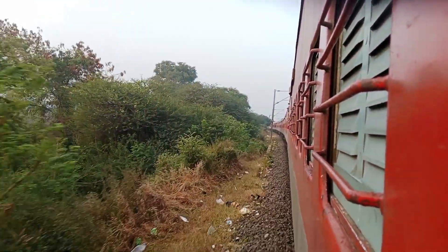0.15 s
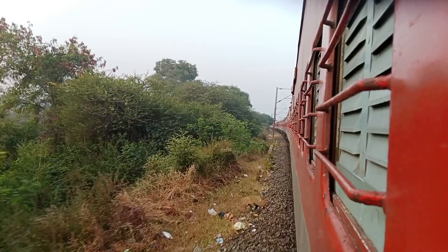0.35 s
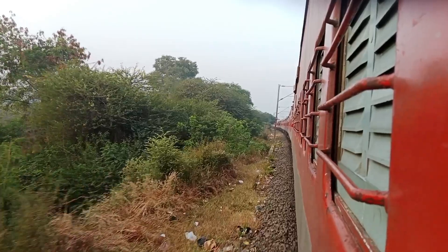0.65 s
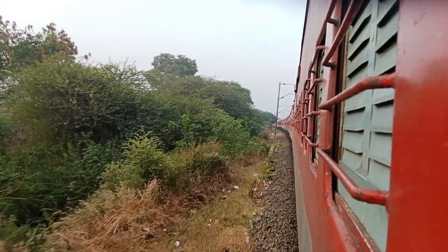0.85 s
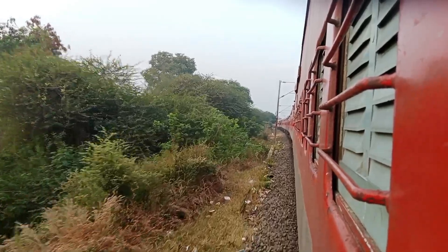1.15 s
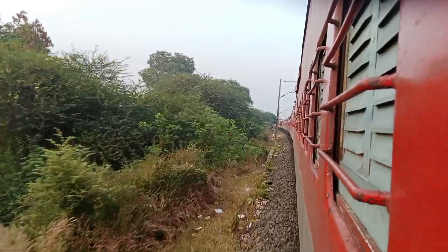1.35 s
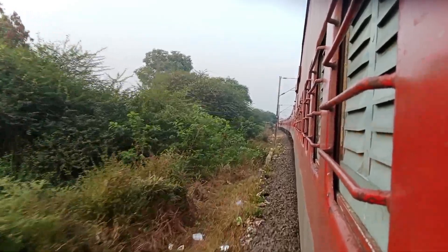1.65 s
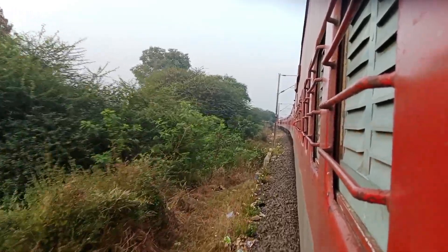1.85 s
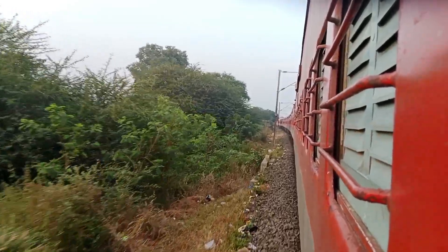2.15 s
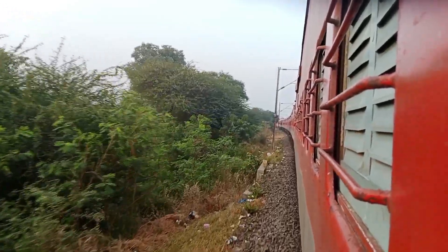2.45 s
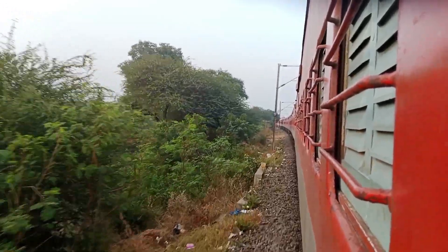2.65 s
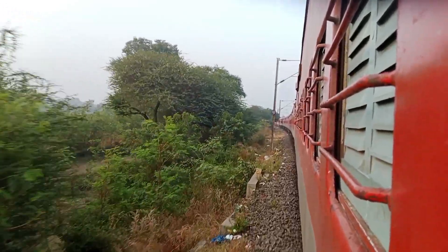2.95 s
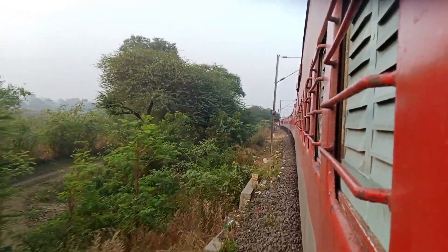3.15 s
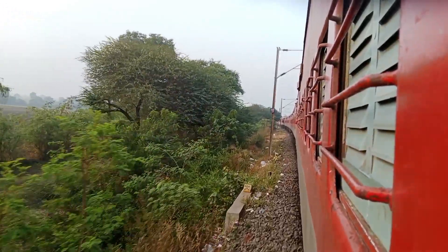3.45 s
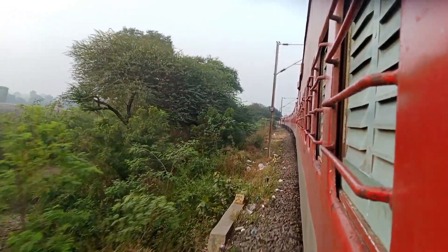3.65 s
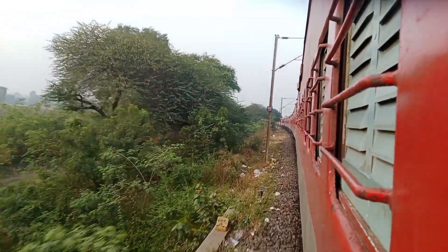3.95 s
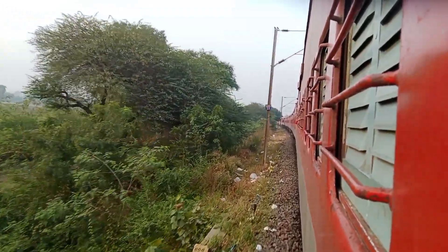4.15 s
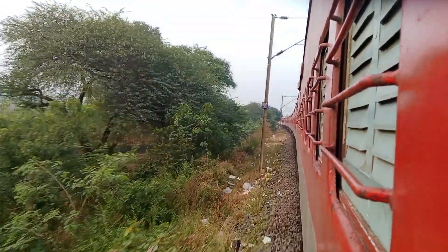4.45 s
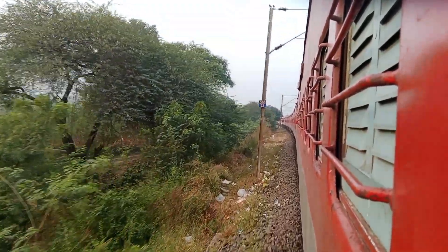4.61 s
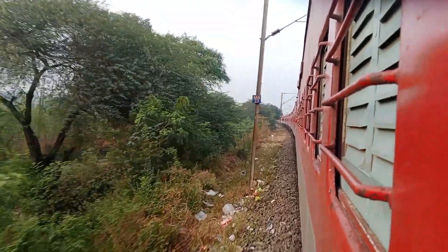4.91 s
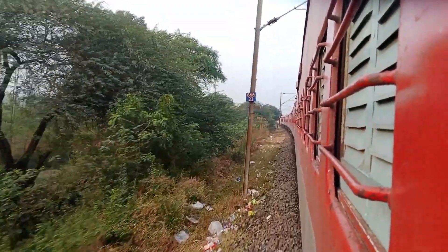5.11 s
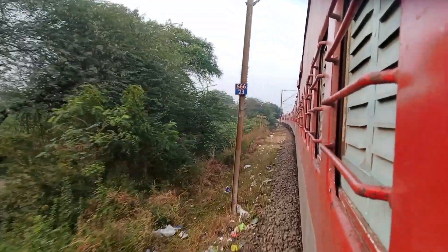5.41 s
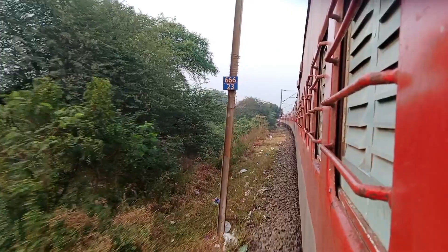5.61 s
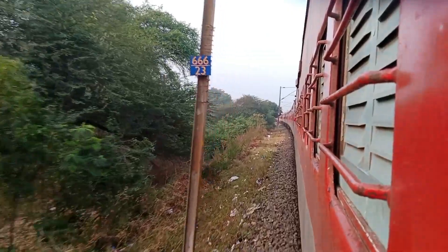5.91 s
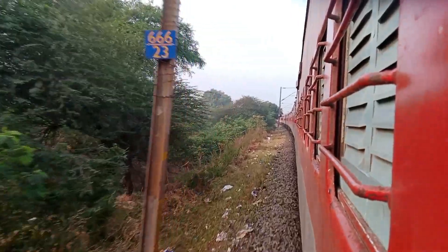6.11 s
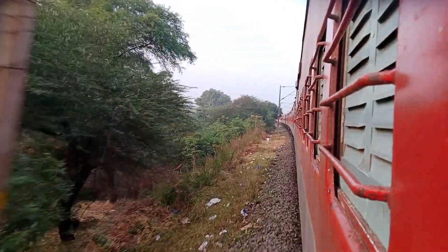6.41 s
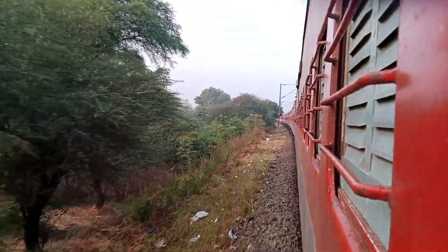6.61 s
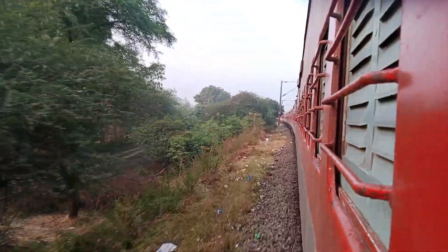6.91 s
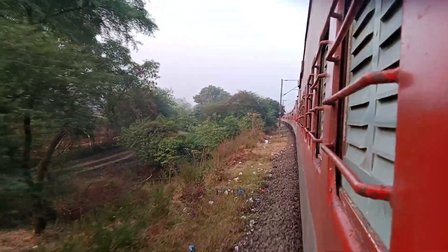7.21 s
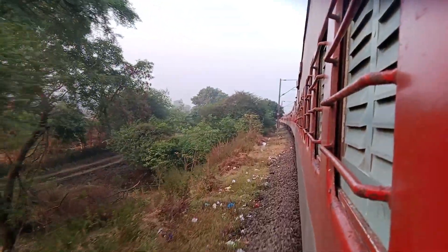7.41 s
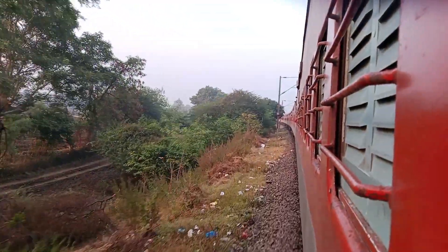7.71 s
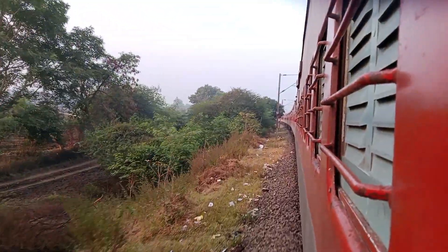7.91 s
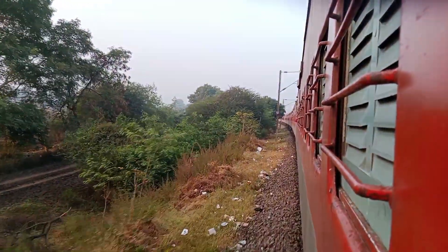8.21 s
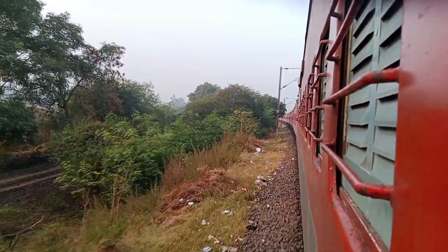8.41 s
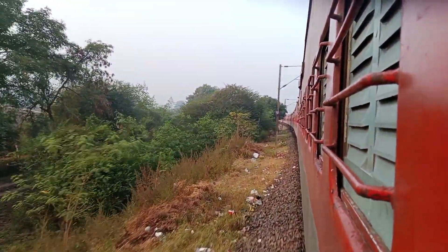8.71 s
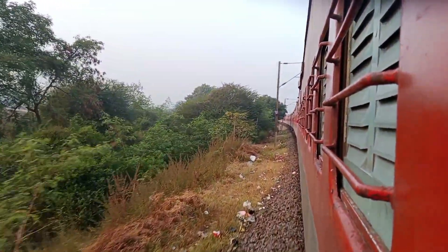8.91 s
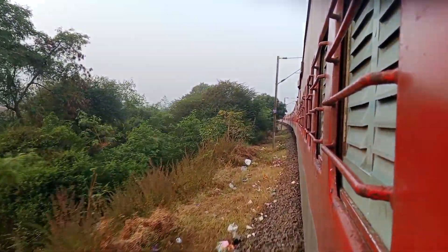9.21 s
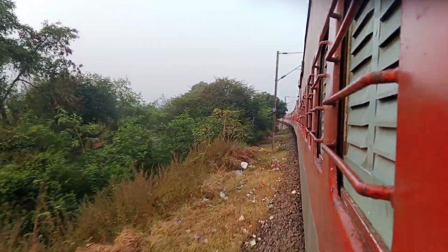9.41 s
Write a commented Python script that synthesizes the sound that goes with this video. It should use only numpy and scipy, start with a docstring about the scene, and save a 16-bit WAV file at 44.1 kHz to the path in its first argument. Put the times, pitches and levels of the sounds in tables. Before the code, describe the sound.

Loose steel window shutters on a rolling train rattle and clack about three times a second over a low wheel rumble and soft wind thuds.

```python
"""Loose steel shutter slats shake about three times a second at an open window of a rolling passenger coach.
They jingle as many small taps on steel tones, clack in short bursts, and single tones ring out of the rattle.
Under them the wheels make a rumble, a roar and two low drones, all shaped from noise.
Wind thuds on the microphone as swells of low noise; now and then a short, wavering hollow note swells."""
import sys
import numpy as np
from scipy import signal
from scipy.fft import rfft, irfft, next_fast_len
from scipy.io import wavfile
from scipy.ndimage import uniform_filter1d, map_coordinates

SR = 44100
rng = np.random.default_rng(int(sys.argv[2]) if len(sys.argv) > 2 else 0)


def to_wav(sig):
    """Store sig (one row per channel, or 1-D mono) as 16-bit WAV at the path in sys.argv[1].

    Samples outside -1..1 are clipped; the rate is SR.
    """
    pcm = np.clip(np.atleast_2d(sig), -1, 1) * 32767
    pcm = np.round(pcm).astype(np.int16)
    wavfile.write(sys.argv[1], SR, pcm.T)  # frames by channels


N = 421596
M = next_fast_len(N + SR)  # length with spare room, so filtering does not wrap round into the scene
HZ = np.fft.rfftfreq(M, 1 / SR)
TIME = np.arange(N) / SR


def amp(db):
    """Turn decibels into a plain amplitude factor."""
    return 10 ** (np.asarray(db) / 20)


def unit(x):
    """Scale a signal to rms 1."""
    return x / np.sqrt(np.mean(x ** 2) + 1e-20)


def along(points, hz):
    """Read a curve of (f/Hz, value) points on a log frequency axis."""
    f, value = np.transpose(points)
    return np.interp(np.log(hz + 1), np.log(f + 1), value)


def curves(rows):
    """Give one value per sample for each column after the time."""
    s, *columns = np.transpose(rows)
    return [np.interp(TIME, s, column) for column in columns]


def wobble(per_s):
    """A smooth random curve through per_s random points a second."""
    points = rng.standard_normal(int(N * per_s / SR) + 4)
    return map_coordinates(points, [TIME * per_s])


def noise(gain):
    """Noise of rms 1 with a gain for each frequency."""
    spectrum = rfft(rng.standard_normal(M)) * gain
    return unit(irfft(spectrum, M)[:N])


def resonance(hz, width_hz, at=HZ):
    """A narrow tone of a vibrating body with a soft start: one pole taken twice."""
    return 1 / (1 + 2j * (at - hz) / width_hz) ** 2


def patchy(x, depth_db):
    """Random gain in patches of about 200 Hz and 50 ms."""
    z = signal.stft(x, nperseg=1024)[2]
    field = uniform_filter1d(rng.standard_normal(z.shape), size=5, axis=0)
    field = uniform_filter1d(field, size=4, axis=1)
    return unit(signal.istft(z * amp(depth_db * unit(field)), nperseg=1024)[1][:N])


def blocky_patches(x, depth_db):
    """Random gain in sharp-edged patches about 200 Hz wide and 60 ms long."""
    z = signal.stft(x, nperseg=512)[2]
    field = uniform_filter1d(rng.standard_normal(z.shape), size=2, axis=0)
    field = uniform_filter1d(field, size=10, axis=1)
    gain = amp(depth_db * np.tanh(1.5 * unit(field) - .6))
    gain = gain / np.sqrt(np.mean(gain ** 2))
    return signal.istft(z * gain, nperseg=512)[1][:N]


def add_tone(out, s, length, hz, width_hz, db, rough, edge):
    """Add a held tone whose size and phase waver width_hz times a second, with soft edges in seconds."""
    t = np.arange(round((length + edge) * SR)) / SR
    knots = rng.standard_normal((2, 40))
    real, imag = (map_coordinates(k, [t * width_hz], mode="grid-wrap") for k in knots)
    waver = 1 + rough * (real + 1j * imag)
    tone = np.real(waver * np.exp(2j * np.pi * hz * t))
    level = np.sin(np.pi / 2 * np.clip(np.minimum(t, t[-1] - t) / edge, 0, 1)) ** 2
    part = out[max(round((s - edge / 2) * SR), 0):][:len(t)]
    part += (amp(db) * level * unit(tone))[:len(part)]


# Colour of the rattling steel: f/Hz, level per Hz/dB
STEEL_COLOUR = [(530, -33), (900, -14.5), (1080, -20), (1230, 2), (1350, 2), (1880, 4.5), (2310, 2.5),
                (4500, 2), (5250, -6), (6510, -7), (7250, -23.5), (10500, -21), (11400, -21), (12300, -56),
                (15600, -37)]


def jingle(modes, taps_per_s, spread_db, waver_db):
    """Spectrum of tones each tapped at its own random moments; each tone's level wavers slowly at random."""
    out = np.zeros(len(HZ), complex)
    half = round(500 * M / SR)  # each tone is worked out 500 Hz to either side
    slots = 2 * half
    slots_per_s = slots * SR / M
    for hz, width_hz, db in modes:
        when, size, turn = rng.random((3, slots))
        waver_points = np.arange(slots) / slots_per_s * 9.5  # 9.5 random points a second
        waver = np.interp(waver_points, np.arange(200), rng.standard_normal(200))
        size_db = waver_db * waver - spread_db * np.log(size + 0.0013)
        tapped = when < taps_per_s / slots_per_s
        taps = tapped * amp(size_db) * np.exp(2j * np.pi * turn)
        centre = round(hz * M / SR)
        near = slice(centre - half, centre + half)
        ring = resonance(hz, width_hz, HZ[near]) / np.sqrt(width_hz)
        out[near] += amp(db + along(STEEL_COLOUR, hz)) * np.fft.fftshift(np.fft.fft(taps)) * ring
    return out


# The four kinds of part, in order: big slats, middle slats, small fittings, finest parts.
# Their level against the idle level: level/dB
PART_REST_DB = [-12, -7, -11, -33]
# How widely each kind follows the shape of a jolt: dB per dB
PART_SWING = [1.036, 1.036, 1.08, 1.21]
# Idle ticking between jolts: t/s, level/dB
IDLE_TICKING = [(0.0, -43.5), (0.74, -41), (0.98, -42.5), (1.89, -38), (3.33, -49), (3.72, -43),
                (5.19, -42), (5.35, -45), (6.42, -43), (6.58, -53), (7.4, -47), (7.53, -44), (8.33, -55),
                (9.56, -46)]
# Jolts of the coach body: t/s, length/s, level/dB, then level/dB against it of the big slats, small fittings
# and finest parts; start below peak/dB, peak at share of length, end below peak/dB, lead-in below peak/dB,
# fall over the tail/dB
JOLTS = [(0.18, 0.14, -29, 0, 0.5, -28.5, 1.5, 0.22, 8.5, 10, 11),
         (0.522, 0.16, -29, -2.5, -7, -31, -1, 0.2, 9, 14, 14),
         (0.877, 0.058, -26.5, 1, -3.5, -24.5, 8, 0.2, 8.5, 8.5, 9),
         (1.152, 0.13, -29.5, -2, -3.5, -23, 1.5, 0.7, 0.5, 18, 9),
         (1.353, 0.035, -34.5, -23, -21, -29, 3, 0.35, 11, 10, 10),
         (1.57, 0.16, -30.5, -5.5, -6.5, -26, 6, 0.26, 6.5, 10, 5),
         (1.869, 0.11, -21.5, -4.5, -8.5, -24, 5, 0.62, 9, 26, 10),
         (2.231, 0.17, -26, -1.5, -4, -17.5, 0, 0.27, 11, 12.5, 11),
         (2.569, 0.14, -25, -0.5, -0.5, -18, 2.5, 0.47, 12, 12.5, 11),
         (2.896, 0.08, -25, -1, -4, -19.5, 0, 0.35, 10.5, 10.5, 3),
         (3.227, 0.11, -28, -5, -5.5, -18, -1, 0.35, 6.5, 14.5, 4),
         (3.563, 0.12, -27.5, -1.5, -1, -21.5, 5.5, 0.29, 5.5, 8, 3.5),
         (3.856, 0.19, -28.5, -1, -6, -20, -0.5, 0.2, 10, 9, 12),
         (4.162, 0.12, -28, 0.5, -2, -18.5, 2.5, 0.77, 10.5, 11, 0.5),
         (4.501, 0.099, -28, -4.5, -3.5, -18.5, 4, 0.85, 7.5, 15, 3.5),
         (4.846, 0.077, -27.5, -0.5, -1.5, -23, 14, 0.33, 7, 16, 6),
         (5.151, 0.1, -29.5, -0.5, -3, -18, 5, 0.78, 7, 33, 0.5),
         (5.442, 0.11, -27, -1.5, -5, -19, 3.5, 0.62, 3.5, 9, 3),
         (5.819, 0.088, -30, -11, -5.5, -22, -1, 0.38, 9.5, 6, 0),
         (6.124, 0.045, -30, -7, -5, -32, -1, 0.5, 7.5, 9, 36),
         (6.44, 0.12, -25, -8, -1.5, -23.5, -1.5, 0.37, 9, 14.5, 21),
         (6.733, 0.13, -21, -5.5, -4, -29, 2.5, 0.47, 8, 16, 26),
         (7.062, 0.095, -31, -4.5, -3, -22, 1, 0.22, 6, 11.5, 8.5),
         (7.363, 0.15, -25.5, -3, -4, -24.5, 1.5, 0.31, 6.5, 15, 9),
         (7.668, 0.13, -26.5, -3, -1.5, -26, 0, 0.22, 12, 9, 7),
         (7.965, 0.076, -31, -1, -3.5, -23, 4, 0.35, 8.5, 7, 14),
         (8.227, 0.13, -27, -8.5, -2, -25.5, 7, 0.51, 6, 22, 28),
         (8.573, 0.056, -30.5, -11, -8.5, -22, 6.5, 0.68, 8, 7.5, 14),
         (8.866, 0.13, -25.5, -5.5, -3.5, -25.5, 0, 0.35, 9.5, 13.5, 20),
         (9.165, 0.055, -27, 1.5, 3, -17.5, 2.5, 0.79, 8.5, 12, 11),
         (9.47, 0.11, -23, -4.5, -3.5, -24.5, 1, 0.35, 14, 13, 14)]
LEAD_S, ATTACK_S, DROP_DB, DROP_S = .056, 0.016, 6, 0.019  # lead-in, attack, and step down at the end
RINGING_DB = 2  # taken off each jolt's rattle to leave room for clacks and single rings
TAIL_S, TAIL_STEEPER = 0.083, [1.48, 1.55, 2.2, 1.2]  # how much steeper each kind of part falls in the tail
HUSH_S, HUSH_DB = 0.087, 6  # the idle ticking settles just before each lead-in


def shaking():
    """Level of each kind of part: a jolt has a lead-in, quick attack, swell, sag, step down and tail."""
    hush_times = [-HUSH_S - ATTACK_S, -ATTACK_S, 0]
    hush_db = sum(np.interp(TIME - s + LEAD_S, hush_times, [0, -HUSH_DB, 0]) for s, *_ in JOLTS)
    idle_db = curves(IDLE_TICKING)[0] + hush_db + 3 * wobble(per_s=14)
    power = amp(np.add.outer(PART_REST_DB, idle_db)) ** 2
    for s, length, db, low_db, high_db, top_db, start_db, share, end_db, lead_db, tail_db in JOLTS:
        t = TIME - s
        rise = share * length
        at = np.cumsum([-LEAD_S - ATTACK_S, ATTACK_S, LEAD_S, ATTACK_S, rise, length - rise, DROP_S])
        body_db = np.interp(t, at, [-60, -lead_db, -lead_db, -start_db, 0, -end_db, -end_db - DROP_DB])
        fall_db = np.outer(TAIL_STEEPER, tail_db * np.maximum(t - at[-1], 0) / TAIL_S)
        part_db = np.add([[low_db], [0], [high_db], [top_db]], db - RINGING_DB)
        power += amp(part_db + np.outer(PART_SWING, body_db) - fall_db) ** 2
    return np.sqrt(power)


# Edges of the pitch ranges of the four kinds of part: f/Hz
PART_EDGES_HZ = [1050, 2300, 4000, 7200, 15600]
# Strongest tones of the slats: f/Hz, width/Hz, level above the crowd of small tones/dB
SLAT_TONES = [(1243, 57, 5.5), (1481, 37, -4.5), (1668, 150, -3), (1864, 97, -6), (2150, 67, 3),
              (2510, 120, 3), (2824, 180, 1.5), (2960, 160, -1.5), (3380, 190, -2), (3556, 150, 9),
              (3916, 88, 7), (4465, 140, 4), (5105, 72, 0.5), (5605, 110, 11), (6630, 60, 3),
              (7650, 100, 17.5), (9890, 160, 15), (11217, 190, 21), (11900, 170, 3), (13200, 400, 4),
              (14700, 400, 14)]


def rattle():
    """Strong slat tones and a crowd of small ones jingle as hard as each kind of part is shaken."""
    crowd_hz = np.linspace(1130, 11700, num=200) + rng.normal(0, 18, size=200)
    crowd = [(hz, 20 + 0.008 * hz, 0) for hz in crowd_hz]
    spectrum = jingle(SLAT_TONES + crowd, taps_per_s=80, spread_db=2, waver_db=3)
    out = np.zeros(N)
    for lo, hi, level in zip(PART_EDGES_HZ, PART_EDGES_HZ[1:], shaking()):
        part = irfft(spectrum * (HZ >= lo) * (HZ < hi), M)[:N]
        # even out the strength over 0.12 s, so that the shaking alone sets the level
        strength = np.sqrt(np.abs(uniform_filter1d(part ** 2, round(0.12 * SR))) + 1e-20)
        out += level * part / strength
    return out


# Wheels on rails: t/s, rumble level/dB, roar level at 330-950 Hz/dB
ROLLING = [(0.0, -47.5, -51), (0.32, -41.5, -52.5), (0.67, -47.5, -55), (1.2, -44.5, -54),
           (1.81, -43.5, -54.5), (2.58, -46, -52), (2.98, -46, -55), (3.67, -46, -52), (4.05, -44, -54),
           (4.13, -43, -51), (4.76, -47, -55), (5.93, -42.5, -53.5), (6.5, -46.5, -55), (7.16, -44.5, -53),
           (8.55, -46, -55.5), (8.92, -44.5, -53.5), (9.37, -49, -52), (9.56, -45, -57)]
# Colour of the rumble: f/Hz, level per Hz/dB
RUMBLE_COLOUR = [(15, -53), (25, -43), (78, -2), (108, 3), (184, -2), (237, -4), (286, -4.5), (400, -9.5),
                 (520, -21.5), (880, -120)]
# Colour of the roar: f/Hz, level per Hz/dB
ROAR_COLOUR = [(250, -56), (330, -2), (600, 1.5), (950, -6.5), (1300, -7.5), (3500, -11), (6000, -21),
               (8000, -32), (11500, -40), (12500, -41), (15500, -39)]
# Unsteady drones: f/Hz, width/Hz, rms level/dB
DRONES = [(111.5, 26, -51), (233.5, 15.3, -53)]
ROAR_DB = 0.9  # the roar over all its band against its level at 330-950 Hz


def wheels():
    """Rolling noise: a wavering rumble, a broad roar, and two drones of noise in narrow bands."""
    rumble_db, roar_db = (curve + 1.5 * wobble(per_s=6) for curve in curves(ROLLING))
    rumble = amp(rumble_db) * patchy(noise(amp(along(RUMBLE_COLOUR, HZ))), depth_db=2.5)
    roar = amp(roar_db + ROAR_DB) * patchy(noise(amp(along(ROAR_COLOUR, HZ))), depth_db=1.8)
    drones = sum(amp(db) * noise(resonance(hz, width_hz)) for hz, width_hz, db in DRONES)
    return rumble + roar + drones


def swell(s, length, edge):
    """A level that rises around s and falls again around s + length; short ones stay below full level."""
    t = TIME - s
    return np.clip(np.minimum(t, length - t) / edge + .5, 0, 1) ** 2


# Wind thuds: t/s, relative level/dB, length/s
WIND_THUDS = [(0.134, -27, .04), (.42, -41, .05), (.72, -51, 0.039), (1.75, -18, 0.063), (2.6, -27, 0.059),
              (4.082, -15, 0.067), (4.364, -50, 0.057), (5.13, -20, 0.028), (5.985, -25, 0.062),
              (6.333, -21.5, 0.022), (8.855, -26, 0.088)]


def wind():
    """Air thuds on the microphone: low noise around 94 Hz let through in short swells."""
    low = noise(resonance(94, 89))
    return low * sum(amp(db - 13.0) * swell(s, length, edge=0.083) for s, db, length in WIND_THUDS)


# Single clacks: t/s, relative level/dB, favoured pitch f/Hz, time to fall by 60 dB/s
CLACKS = [(0.1323, -22, 4390, 0.12), (0.2053, -8, 2670, 0.071), (0.4875, -14.5, 2390, 0.22),
          (0.5437, -3, 4410, 0.07), (0.8077, -20, 1280, 0.23), (0.8834, -13, 1903, 0.14),
          (1.1653, -16, 3360, 0.083), (1.2266, -17, 3424, 0.23), (1.3647, -15.5, 3120, 0.093),
          (1.5054, -10.5, 1240, 0.028), (1.565, -7, 3550, 0.041), (1.6067, -9.5, 1406, 0.039),
          (1.6661, -16.5, 1246, 0.1), (1.849, -18, 2990, 0.15), (1.9074, -5.5, 3343, 0.075),
          (2.047, -15.5, 1242, 0.093), (2.246, -6, 4510, 0.051), (2.5193, -18.5, 4010, 0.32),
          (2.5727, -26, 2190, 0.096), (2.6554, -10, 4537, 0.18), (2.772, -25.5, 4970, 0.1),
          (2.86, -16, 1815, 0.13), (2.911, -8, 4430, 0.11), (3.189, -10, 3970, 0.06),
          (3.242, -9, 1790, 0.053), (3.515, -22, 3940, 0.17), (3.571, -10, 3450, 0.084),
          (3.8434, -12.5, 4460, 0.067), (3.9104, -3, 1940, 0.052), (4.1683, -10.5, 2920, 0.13),
          (4.3702, -15, 1640, 0.036), (4.4987, -12, 4760, 0.092), (4.556, -11.5, 3940, 0.12),
          (4.818, -15, 2640, 0.088), (4.8453, -35, 4330, 0.12), (5.1359, -17, 3260, 0.17),
          (5.1927, -8.5, 3346, 0.093), (5.361, -16.5, 2750, 0.1), (5.418, -21.5, 4080, 0.18),
          (5.457, -23, 3420, 0.068), (5.509, -7, 3940, 0.09), (5.6569, -16.5, 1480, 0.26),
          (5.7718, -16.5, 3900, 0.14), (5.825, -13.5, 2860, 0.14), (6.0827, -13.5, 4770, 0.13),
          (6.1383, -10.5, 3670, 0.13), (6.4492, -18, 3380, 0.12), (6.7073, -18, 4344, 0.17),
          (6.76, -2, 3300, 0.087), (7.01, -20.5, 2780, 0.17), (7.0678, -11, 2900, 0.058),
          (7.3142, -23.5, 1426, 0.27), (7.3813, -0.5, 4270, 0.054), (7.478, -14, 3360, 0.13),
          (7.6273, -22, 3390, 0.13), (7.6823, -10, 3440, 0.14), (7.728, -12, 3500, 0.14),
          (7.972, -14.5, 2810, 0.089), (8.1008, -21, 1770, 0.079), (8.229, -17, 4630, 0.097),
          (8.2888, -15, 2857, 0.14), (8.5859, -15, 3370, 0.081), (8.8264, -27, 3400, 0.099),
          (8.865, -15, 4390, 0.12), (8.968, -18, 4330, 0.17), (9.1184, -26, 3860, 0.19),
          (9.179, -8, 1660, 0.071), (9.2986, -19.5, 4370, 0.092), (9.413, -27, 1350, 0.13),
          (9.469, -4.5, 1316, 0.085)]
DULL_HZ, DULL_DB = 6940, -3.5  # clacks carry less of the finest parts: above this pitch, level change


def clacks():
    """Each clack rings all slat tones at new strengths, most near its own pitch, over a burst of chatter."""
    out, t = np.zeros(N + SR), np.arange(SR // 4) / SR
    hz, _, level = np.transpose(SLAT_TONES)
    for s, db, own_hz, t60 in CLACKS:
        pitch = np.append(hz * (1 + 0.013 * rng.standard_normal(len(hz))), own_hz)
        slat_db = level - 29.5 + along(STEEL_COLOUR, hz) + 4 * rng.standard_normal(len(hz))
        gain = amp(np.append(slat_db, 0))
        turn = rng.random((len(pitch), 1))
        ring = gain @ np.sin(2 * np.pi * (pitch[:, None] * t + turn)) * amp(-60 * t / t60)
        chatter = amp(-2.5 - 60 * t / 0.17) * rng.standard_normal(len(t))
        rise = 1 - np.exp(-t / 0.003)
        out[round(s * SR):][:len(t)] += amp(db - 11.5) * rise * (ring + chatter)
    # steel this small radiates neither bass nor far treble
    colour_db = np.minimum(1.13 * along(STEEL_COLOUR, HZ) + 6, 0) + DULL_DB * (HZ > DULL_HZ)
    return irfft(rfft(out, M) * amp(colour_db), M)[:N]


def flight():
    """Just before a clack the slats are in the air, so the rattle thins out and returns with the blow."""
    db, before = np.zeros(N), np.arange(SR // 20) / SR
    dip_db = 6 * np.exp(-before / .018) * (1 - np.exp(-before / .003))
    for s, *_ in CLACKS:
        db[round(s * SR)::-1][:len(before)] -= dip_db  # runs backwards in time from the clack
    return amp(db)


# Single slat tones that stand out of the rattle, loud and soft: t/s, length/s, f/Hz, rms level/dB
SINGLE_RINGS = [(0.189, 0.1, 5790, -38.5), (0.198, 0.054, 2776, -29), (0.203, 0.063, 1224, -33),
                (0.213, 0.04, 3420, -40), (0.249, 0.15, 4470, -40), (0.275, 0.035, 2880, -45),
                (0.296, 0.078, 1900, -45), (0.471, 0.07, 2410, -40), (0.535, 0.032, 4400, -27),
                (0.54, 0.12, 1936, -35), (0.574, 0.055, 5520, -40.5), (0.577, 0.042, 1188, -37),
                (0.609, 0.128, 4440, -44.5), (0.629, 0.065, 3330, -38), (0.824, 0.035, 1264, -34),
                (0.875, 0.061, 1883, -31), (0.886, 0.045, 3020, -36), (1.161, 0.12, 3366, -33),
                (1.213, 0.038, 2900, -35), (1.229, 0.071, 4930, -39), (1.232, 0.05, 1200, -33.5),
                (1.359, 0.036, 3135, -33.5), (1.562, 0.23, 2840, -43), (1.843, 0.063, 3080, -40),
                (1.591, 0.055, 2430, -36.5), (1.598, 0.042, 1442, -32), (1.656, 0.054, 1224, -34.5),
                (1.902, 0.053, 3366, -28.5), (1.938, 0.045, 2620, -36), (2.03, 0.041, 1250, -39),
                (2.029, 0.058, 3330, -39), (2.233, 0.033, 4790, -26.5), (2.237, 0.034, 3430, -31),
                (2.245, 0.038, 4460, -28), (2.242, 0.09, 2125, -33.5), (2.301, 0.065, 3410, -31),
                (2.326, 0.074, 1225, -36.5), (2.516, 0.092, 3970, -41), (2.565, 0.064, 1515, -36),
                (2.56, 0.097, 2157, -29), (2.574, 0.045, 3130, -35), (2.615, 0.09, 3370, -32.5),
                (2.639, 0.025, 4810, -23.5), (2.643, 0.029, 4480, -21.5), (2.696, 0.064, 4400, -41),
                (2.896, 0.19, 4360, -41.5), (2.757, 0.032, 4810, -37.5), (2.905, 0.055, 2775, -38),
                (2.9, 0.072, 2010, -35), (2.953, 0.055, 3450, -35), (2.921, 0.045, 1210, -32),
                (3.21, 0.11, 1916, -30), (3.237, 0.061, 4620, -35), (3.276, 0.044, 3000, -37),
                (3.303, 0.077, 4440, -40.5), (3.51, 0.1, 3990, -38), (3.563, 0.11, 1586, -37.5),
                (3.566, 0.19, 5640, -44), (3.574, 0.063, 4430, -36), (3.588, 0.044, 2520, -38),
                (3.235, 0.073, 3610, -37), (3.561, 0.098, 3376, -33), (3.864, 0.097, 1850, -30.5),
                (3.889, 0.074, 1285, -30.5), (3.891, 0.11, 3420, -36.5), (3.896, 0.062, 3820, -28.5),
                (3.91, 0.052, 2590, -33), (3.945, 0.11, 4350, -39.5), (3.949, 0.059, 1400, -37),
                (3.965, 0.049, 3710, -38), (4.034, 0.049, 2120, -38.5), (4.154, 0.12, 3390, -33.5),
                (4.175, 0.039, 2790, -29.5), (4.178, 0.11, 1913, -29), (4.224, 0.056, 4390, -33),
                (4.49, 0.043, 4650, -35), (4.571, 0.028, 3180, -29.5), (4.835, 0.085, 3390, -33.5),
                (4.839, 0.046, 4380, -33), (5.143, 0.12, 2086, -36), (5.209, 0.043, 1227, -29.5),
                (5.216, 0.046, 4990, -33), (5.496, 0.081, 1460, -33.5), (5.506, 0.05, 2220, -28),
                (5.517, 0.049, 4100, -29.5), (5.648, 0.049, 4420, -32), (5.659, 0.036, 1435, -40.5),
                (5.767, 0.088, 4340, -38.5), (5.807, 0.077, 2820, -37), (5.872, 0.021, 1265, -38),
                (5.821, 0.031, 4900, -31), (6.128, 0.036, 4820, -35), (6.159, 0.034, 4010, -34.5),
                (6.164, 0.025, 1880, -31.5), (6.164, 0.025, 3390, -30), (6.452, 0.049, 3620, -38.5),
                (6.457, 0.13, 1510, -34.5), (6.46, 0.11, 1770, -33), (6.744, 0.11, 2660, -31),
                (6.75, 0.042, 3360, -29), (6.752, 0.08, 1800, -29.5), (6.79, 0.05, 3820, -32),
                (6.852, 0.04, 2580, -34.5), (7.061, 0.063, 4360, -33.5), (7.093, 0.03, 1910, -32),
                (7.306, 0.21, 1455, -37.5), (7.37, 0.075, 2705, -30), (7.372, 0.088, 4380, -27),
                (7.372, 0.04, 2220, -35), (7.436, 0.089, 3390, -39), (7.714, 0.062, 4450, -41),
                (7.639, 0.15, 1240, -40.5), (7.66, 0.049, 1770, -37), (7.713, 0.045, 2510, -33.5),
                (7.625, 0.11, 3500, -37), (7.709, 0.027, 3930, -25), (7.735, 0.077, 3060, -34),
                (7.96, 0.041, 3540, -36), (8.01, 0.043, 3130, -37), (8.093, 0.047, 1900, -38),
                (8.225, 0.13, 3370, -34.5), (8.295, 0.054, 2880, -32.5), (8.302, 0.06, 1237, -37),
                (8.222, 0.11, 4470, -38), (8.528, 0.14, 4400, -40.5), (8.576, 0.053, 3510, -38),
                (8.599, 0.049, 1900, -37), (8.86, 0.052, 6400, -39), (8.954, 0.087, 4430, -36.5),
                (8.872, 0.055, 2590, -36), (9.198, 0.039, 4480, -26.5), (9.159, 0.03, 1680, -33),
                (9.175, 0.078, 3450, -37), (9.299, 0.064, 1920, -39), (9.468, 0.072, 1250, -36)]
FAINT_DB, FAINT_S, FAINT_SPREAD_DB = -12.5, 0.0603, 0.5  # chance rings: level against jolt, mean length, scatter
BIG_HZ, BIG_DB = 1238, -13  # the biggest slat rings in every jolt: pitch, level against the big slats


def rings():
    """Single slat tones ring out of the rattle, often several together, kept alive and roughened by chatter."""
    out, faint = np.zeros(N), []
    low_tones = [hz for hz, *_ in SLAT_TONES[:12]]
    for s, length, db, low_db, *_ in JOLTS:
        for when, span, pick, size in rng.random(size=(2, 4)):
            hz = low_tones[int(pick * len(low_tones))]
            faint_db = db + FAINT_DB + FAINT_SPREAD_DB * (2 * size - 1)
            faint.append((s + when * length / 2, FAINT_S * (.5 + span), hz, faint_db))
        faint.append((s + length * rng.random() / 2, length / 2, BIG_HZ, db + low_db + BIG_DB))
    for s, length, hz, db in SINGLE_RINGS + faint:
        add_tone(out, s, length, hz, 130, db, rough=2.5, edge=.01)
    return out


# Hollow notes: t/s, length/s, f/Hz, width/Hz, rms level of the tone/dB
HOLLOW_NOTES = [(0.43, 0.041, 565, 340, -48), (0.417, 0.029, 298, 140, -42.5), (.43, 0.039, 140, 63, -39),
                (5.32, 0.029, 532, 69, -47.5), (5.448, 0.074, 397, 107, -47.5),
                (3.929, 0.036, 1015, 91, -43), (4.027, 0.11, 104.6, 21, -33.5),
                (4.226, 0.032, 518, 95, -44), (4.253, 0.077, 229, 12.3, -23.5),
                (6.706, 0.045, 838, 51, -35.5), (6.753, 0.065, 572, 84, -38), (6.781, 0.1, 804, 67, -41),
                (7.004, 0.05, 564.4, 168, -33.5), (7.054, 0.033, 620, 30, -36.5),
                (7.304, 0.036, 600, 95, -42), (9.042, 0.054, 520, 74, -42), (9.303, 0.066, 661, 146, -37.5),
                (9.335, 0.033, 502, 160, -42), (9.413, 0.032, 395, 300, -35.5),
                (9.474, 0.036, 793, 74, -46.5)]


def notes():
    """Short hollow notes: a wavering tone inside a broader, breathy body at the same pitch."""
    out = np.zeros(N)
    for s, length, hz, width_hz, db in HOLLOW_NOTES:
        add_tone(out, s, length, hz, width_hz, db, rough=1.9, edge=0.0206)
        add_tone(out, s, length, hz, .6 * hz - 60, db - 4, rough=2.8, edge=0.02002)  # breathy body
    return out


def scene():
    """Add the steel, the wheels, the wind and the hollow notes."""
    shaken = flight() * (blocky_patches(rattle(), depth_db=8.5) + rings())
    steel = shaken + blocky_patches(clacks(), depth_db=6.5)
    return (steel + wheels() + wind() + notes())[None]


def record(dry):
    """The microphone chain keeps nothing from 15600 Hz up."""
    return irfft(rfft(dry, M) * (HZ < 15600), M)[:, :N]


dry = scene()
out = record(dry)
to_wav(out)
```